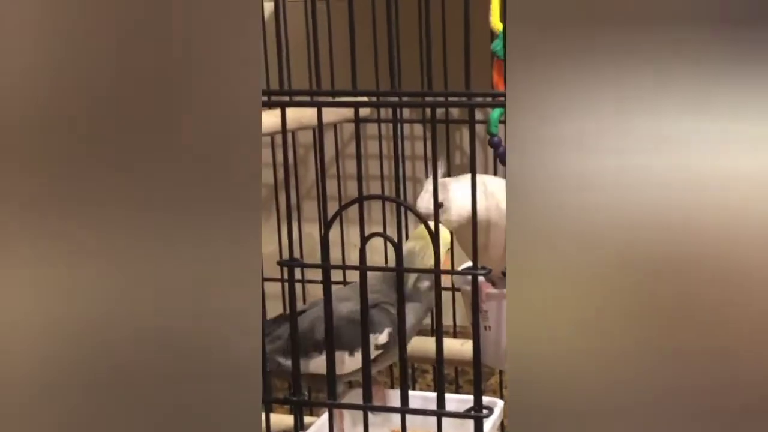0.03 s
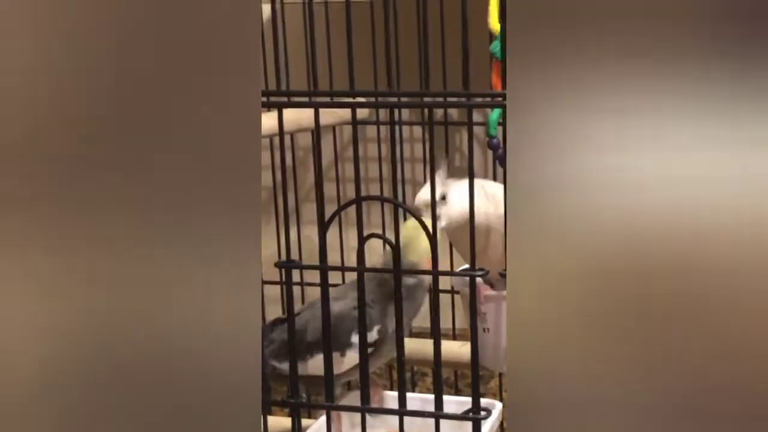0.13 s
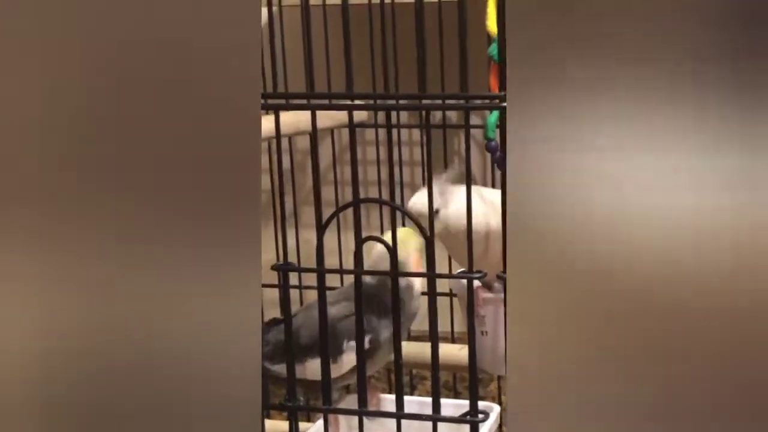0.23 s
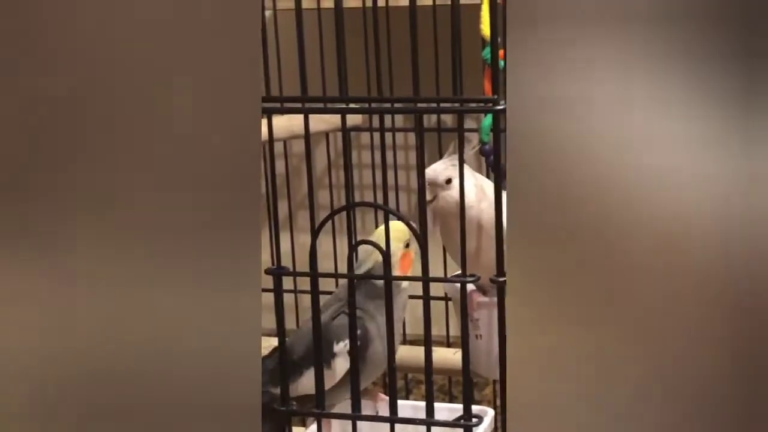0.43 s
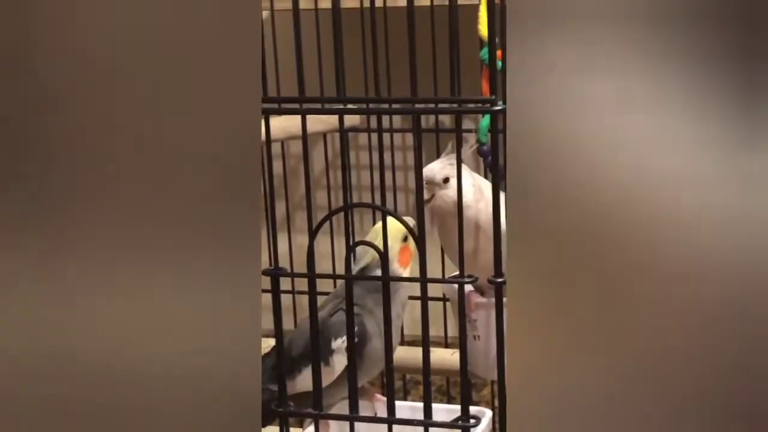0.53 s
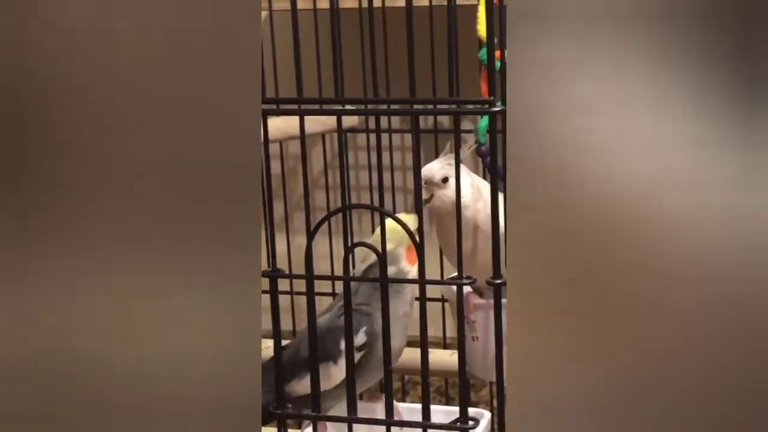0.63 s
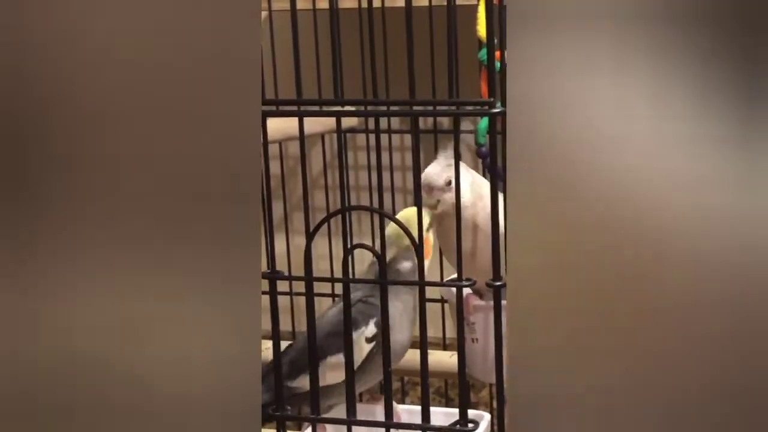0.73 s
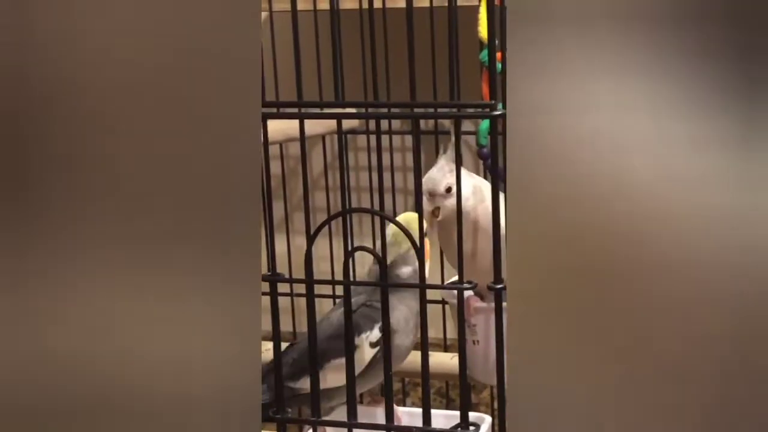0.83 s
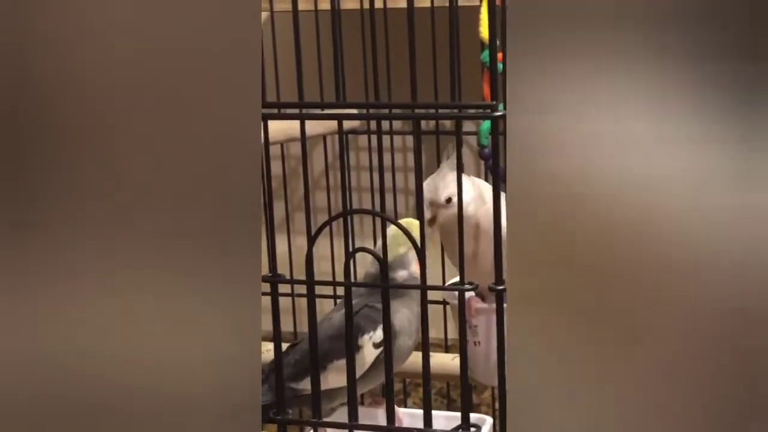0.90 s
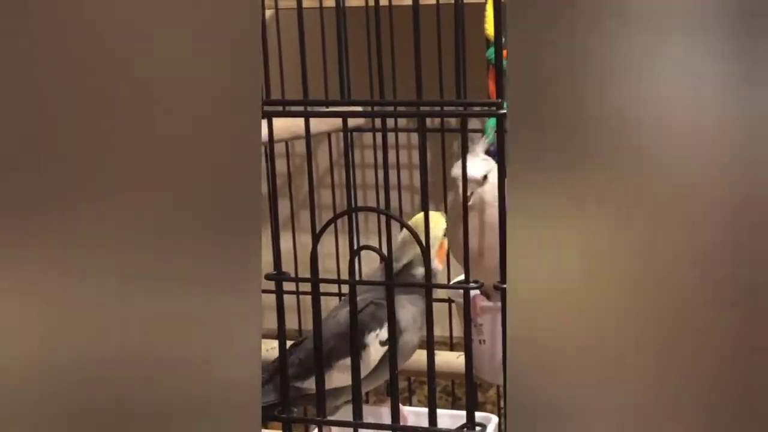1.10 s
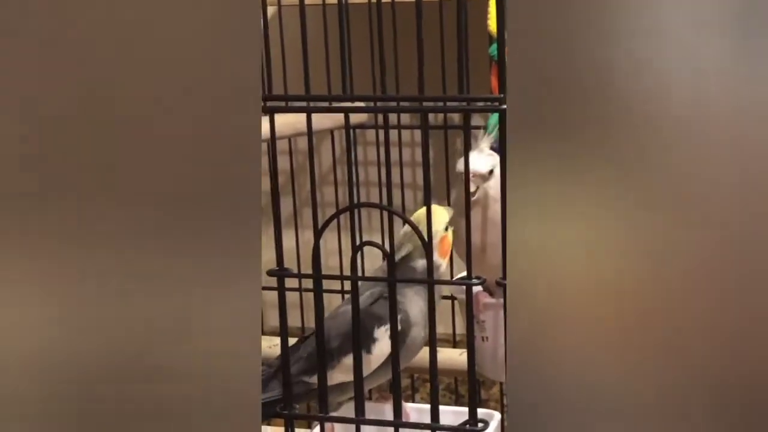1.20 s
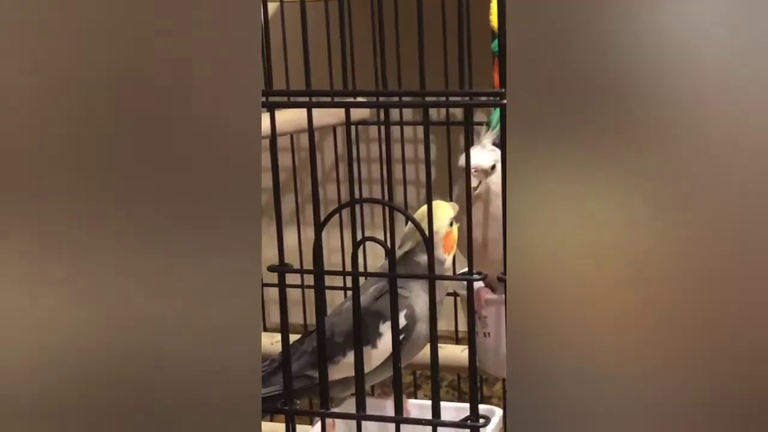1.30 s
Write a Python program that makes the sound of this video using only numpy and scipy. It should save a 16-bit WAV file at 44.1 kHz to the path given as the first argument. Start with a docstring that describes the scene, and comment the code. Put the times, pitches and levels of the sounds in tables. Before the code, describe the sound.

Two caged cockatiels quarrel with a harsh, raspy screech and hisses in a small room.

```python
"""Two caged cockatiels quarrel: a low squawk, a harsh screech in several pushes, and hisses.
Each squawk is an unsteady whistle of the syrinx with its harmonics, wrapped in a rasp of
sputtering air that rings the throat. The scene opens on the breathy tail of a squawk, and the
screech ends on a whistle and a rattle of puffs.
The cage ticks faintly; the small room rings briefly over a low hum."""
import sys
import numpy as np
from scipy import signal
from scipy.fft import rfft, irfft
from scipy.io import wavfile
from scipy.ndimage import map_coordinates

SR = 44100
rng = np.random.default_rng(int(sys.argv[2]) if len(sys.argv) > 2 else 0)


def waveform_to_disk(signal):
    """Save audio, clipped to [-1, 1], as 16-bit WAV at the path in sys.argv[1]."""
    frames = np.transpose(np.atleast_2d(signal))
    scaled = np.clip(frames, -1, 1) * 32767
    samples = np.round(scaled).astype(np.int16)
    wavfile.write(sys.argv[1], SR, samples)


N = 59535

# Syrinx notes: the squawk, the first and last push of the screech, the closing whistle
# (time [s], pitch [Hz], level [dB], roughness [0-1])
LOW_SQUAWK = [(.217, 1901, -58, 0.98), (.228, 2068, -45, 0.57), (.238, 2078, -45, 0.6),
              (.248, 2305, -40.5, 0.25), (.257, 2235, -44, 1), (.266, 2405, -36, 0.22),
              (.277, 2419, -51, 1.1), (.287, 2501, -36.5, 0.1), (.298, 2460, -43, 0.5)]
RISING_SCREECH = [(.394, 2420, -46, 0.52), (.406, 2327, -55, 0.63), (.409, 2507, -31.5, 0.084),
                  (.413, 2478, -38, 0.33), (.427, 2487, -28.5, .06), (.432, 2800, -41, 0.39),
                  (.442, 3160, -28, 0.25), (.451, 3240, -34, 0.048), (.469, 3275, -29.5, 0.3),
                  (.480, 3310, -43, 0.26)]
SHORT_SCREECH = [(.574, 2490, -39.5, 0.52), (.586, 2900, -47, 0.65), (.594, 3180, -32, 0.077),
                 (.599, 3132, -40, .3), (.610, 3047, -44, 0.73)]
WHISTLE = [(.606, 2080, -62, 0.33), (.621, 2140, -32, .15), (.625, 2091, -31, 0.041),
           (.633, 2112, -30.5, 0.047), (.642, 2050, -43, .25)]
# Middle push of the screech, settling into a steady 3.2 kHz room ring (same columns)
MIDDLE_PUSH_AND_RING = [(.483, 2296, -51, 0.98), (.508, 2683, -57.5, 0.47), (.517, 3180, -45, 0.15),
                        (.565, 3220, -47, 0.083)]
# The syrinx's second side sounding apart, and the voiced core of a late hiss (same columns)
SQUAWK_SECOND_SIDE = [(.224, 2080, -43.5, 0.03), (.229, 2050, -47.5, 0.14), (.233, 1772, -52, 0.25),
                      (.242, 1697, -43.5, .2), (.250, 1660, -55, 0.6)]
SCREECH_SECOND_SIDE = [(.458, 2400, -44, 0.47), (.462, 2510, -26.5, 0.25), (.466, 2480, -36, 0.52),
                       (.484, 2380, -44.5, 0.82), (.496, 2090, -43, 0.55), (.512, 2100, -42, 0.16),
                       (.522, 2380, -36, 0.25), (.538, 2185, -40, 0.77), (.568, 2320, -46, 0.85)]
HISS_CORE = [(.907, 2780, -53, .8), (.934, 2530, -49, .85), (.984, 2366, -46, 0.8), (.992, 2285, -40, .45),
             (.998, 2380, -48, 0.85), (1.014, 2530, -46, 0.67)]
# Harmonic balance of the notes, from the fundamental up (relative level [dB])
LOW_HARMONICS = [-2.5, -6, -8.5, -16]
SCREECH_HARMONICS = [-13.5, 1.3, -11.5]
MIDDLE_HARMONICS = [0, 0.72, -5]
WHISTLE_HARMONICS = [-38, 16, -14, -15]
CORE_HARMONICS = [-27, 5, -15]
def squawks():
    """The pitched layer of the calls; the two sides of the syrinx can hold separate notes."""
    return (syrinx(LOW_SQUAWK, LOW_HARMONICS) + syrinx(SQUAWK_SECOND_SIDE, CORE_HARMONICS)
            + syrinx(RISING_SCREECH, SCREECH_HARMONICS)
            + syrinx(MIDDLE_PUSH_AND_RING, MIDDLE_HARMONICS)
            + syrinx(SCREECH_SECOND_SIDE, CORE_HARMONICS)
            + syrinx(SHORT_SCREECH, SCREECH_HARMONICS)
            + syrinx(WHISTLE, WHISTLE_HARMONICS)
            + syrinx(HISS_CORE, CORE_HARMONICS))


JITTER, JITTER_HZ = 0.0566, 850  # pitch spread at full roughness, and its speed
SHIMMER_DB, SPUTTER_HZ = 7, 294  # level spread at full roughness, and its speed
def syrinx(note, harmonics):
    """A whistle with harmonics; roughness shakes its pitch and level."""
    hz, db, rough = (automation(note, column) for column in (1, 2, 3))
    rough = np.clip(rough, 0, 1)
    pitch = hz * (1 + JITTER * rough * wander(JITTER_HZ))
    phase = 2 * np.pi * np.cumsum(pitch) / SR
    weights = undb(harmonics) / np.sqrt(np.sum(undb(harmonics) ** 2) / 2)
    tone = sum(w * np.sin(k * phase) for k, w in enumerate(weights, 1))
    shimmer_db = SHIMMER_DB * rough * np.clip(wander(SPUTTER_HZ), -2, 2)
    return tone * undb(db + shimmer_db) * gate(note)


# Breath envelopes of the squawk and the three pushes (time [s], level [dB])
LOW_RASP = [(.216, -45), (.226, -42.5), (.250, -49.5), (.280, -47.5), (.296, -50)]
FIRST_RASP = [(.394, -35), (.405, -38.5), (.415, -32.5), (.432, -36), (.456, -42.5), (.464, -45.5),
              (.474, -40), (.482, -37)]
MIDDLE_RASP = [(.480, -51), (.497, -37.5), (.514, -41.5), (.522, -33.5), (.538, -47), (.551, -70),
               (.570, -50)]
LAST_RASP = [(.574, -49), (.603, -35.5), (.618, -40), (.632, -38)]
# Throat colour of each (frequency [Hz], relative level [dB])
LOW_THROAT = [(300, -13), (850, -3.5), (1300, -8), (1700, 3), (2200, -8), (2700, 2.5), (3500, 3),
              (5200, -3), (6800, -1.5), (8200, -27), (10000, -2), (12000, -17.5)]
FIRST_THROAT = [(1400, -46), (2100, -10.5), (2600, -16.5), (3500, -27.5), (4300, -4.5), (4900, 3.5),
                (5500, -0.5), (6100, 1.5), (7100, -2), (9000, -8.5), (12000, -15.5)]
MIDDLE_THROAT = [(1500, -51), (2500, -12), (2950, -20), (3200, 0), (3500, 0), (4670, 0.5), (5500, 3),
                 (5830, 5), (6370, 2), (7610, -3), (9080, 0), (11200, -14), (12100, -25)]
LAST_THROAT = [(1900, -40), (2500, -10), (3050, 1.5), (3700, -36), (4400, 11.5), (5100, 11), (6150, 12),
               (6800, 0), (7400, -14), (8600, 12.5), (9800, -7), (11500, -2)]
# The throat tightens and relaxes in the first push (time [s], resonance shift [ratio])
FIRST_GLIDE = [(0.395, 0.93), (.428, 1.01), (.448, 1.08), (0.469, .98)]
def rasps():
    """The breath layer: rasping air around the squawk and each push of the screech."""
    return (rasp(LOW_RASP, LOW_THROAT) + rasp(FIRST_RASP, FIRST_THROAT, FIRST_GLIDE)
            + rasp(MIDDLE_RASP, MIDDLE_THROAT) + rasp(LAST_RASP, LAST_THROAT))


def rasp(envelope, throat, glide=None):
    """Air torn into irregular puffs, coloured by the throat, whose resonances may glide."""
    air = noise(throat)
    if glide is not None:  # varispeed moves all resonances together
        air = map_coordinates(air, [np.cumsum(automation(glide))], order=5, mode="mirror")
    return air * flutter(SPUTTER_HZ, depth_db=4) * undb(automation(envelope)) * gate(envelope)


# Envelope of the rattle's puffs (time [s], level [dB])
RATTLE = [(.634, -34), (.638, -22), (0.647, -35.5), (0.655, -29.5), (.668, -34.5), (0.685, -34)]
# Throat colour of the rattle (frequency [Hz], relative level [dB])
RATTLE_THROAT = [(2300, -37), (3100, -24), (3750, -30), (4150, 1.5), (4500, 6.5), (5300, -7), (6100, 8),
                 (6700, -12), (7350, -42), (8600, -7), (10200, -12), (12000, -28)]
RATTLE_START_HZ, RATTLE_END_HZ, RATTLE_JITTER, PUFF_DECAY_S = 268.4, 169.3, .06, 0.0023
def rattle():
    """The whistle breaks into separate puffs that slow down and fade, each ringing the throat."""
    t = times()
    start, end = RATTLE[0][0], RATTLE[-1][0]
    on = (t > start) & (t < end)
    rate = np.interp(t, (start, end), (RATTLE_START_HZ, RATTLE_END_HZ))
    rate *= 1 + RATTLE_JITTER * wander(RATTLE_END_HZ)
    puff_age = (np.cumsum(rate * on) / SR % 1) / rate
    puffs = on * np.exp(-puff_age / PUFF_DECAY_S) * undb(automation(RATTLE))
    return noise(RATTLE_THROAT, puffs)


# The breathy tail of a squawk, then four hisses; a negative sag swells
# (start [s], length [s], level [dB], attack [s], sag [dB/s], release [s])
BREATHS = [(-.01, 0.072, -50.5, .008, 46, 0.027), (0.077, 0.13, -53.5, 0.014, -26, 0.024),
           (0.711, 0.059, -51, 0.0061, 31, 0.034), (0.902, 0.075, -43.5, 0.034, 31, 0.019),
           (1.011, 0.018, -45, 0.0055, 5, 0.023)]
# One throat colour per breath (frequency [Hz], relative level [dB])
BREATH_THROATS = [
    [(1800, -25), (2450, -13), (2700, -18), (3220, -6.5), (3700, -18.5), (4600, -10), (5050, 1),
     (5450, -14.5), (6300, -8), (8300, -27), (11000, -21)],
    [(1800, -16), (2500, -10.5), (3500, -18), (4000, 1), (4900, -3.5), (5800, -10), (7300, -14.5),
     (9000, -12), (12000, -30)],
    [(2000, -15.5), (2600, -9), (3050, 1.5), (3500, -11.5), (4150, 6.5), (4650, 0), (5300, -6.5),
     (5900, -17), (7700, -15), (9400, -4), (10600, -24)],
    [(1750, -53), (2200, -15), (2650, -10), (3400, -20.5), (4100, -3.5), (4800, -5), (5700, -0.5),
     (6400, -5), (7100, -24), (8500, -10.5), (10000, -11.5), (12000, -28.5)],
    [(2400, -16), (3250, -5.5), (3700, -4.5), (4400, 4.5), (5300, 4), (6200, -8), (6800, -20), (8400, -2),
     (9200, -12), (10200, -9), (11200, -41)],
]
def breaths():
    """Sputtering air for a squawk's tail and four hisses: attack, a sloping hold, release."""
    out = np.zeros(N)
    for (start, length, db, attack, sag, release), throat in zip(BREATHS, BREATH_THROATS):
        age = times() - start
        fade_in = np.sqrt(np.clip(age / attack, 0, 1))
        hold = undb(db - sag * np.clip(age, 0, length))
        fade_out = np.exp(-np.maximum(age - length, 0) / release)
        out += fade_in * hold * fade_out * noise(throat) * flutter(SPUTTER_HZ, depth_db=1.5)
    return out


# Taps on the cage (time [s], level [dB])
TICKS = [(1.221, -57), (1.296, -64.5)]
# Ring of the bars (frequency [Hz], relative level [dB])
TICK_COLOUR = [(2000, -9), (3500, -22), (4700, 2), (6500, -16), (9000, 1.5), (12000, -28)]
TICK_DECAY_S = 0.0066
def cage():
    """Light taps of a claw or beak on the bars."""
    t = times()
    taps = sum(undb(db) * (t > s) * np.exp(-np.abs(t - s) / TICK_DECAY_S) for s, db in TICKS)
    return noise(TICK_COLOUR) * taps


# Early reflections from wall, tray and shelf (delay [s], relative level [dB])
REFLECTIONS = [(.0027, -13.5), (.0046, 0)]
def reflect(x):
    """Near surfaces comb the breathy sounds; their power stays the same."""
    t = times()
    echoes = sum(undb(db) * map_coordinates(x, [np.round((t - delay) * SR)], order=0)
                 for delay, db in REFLECTIONS)
    return (x + echoes) / np.sqrt(1 + sum(undb(db) ** 2 for _, db in REFLECTIONS))


ROOM_T60_S, TREBLE_T60_S, CROSSOVER_HZ = 0.32, 0.24, 6500
WET_DB, PREDELAY_S = -5, 0.0024
def room(x):
    """Direct sound and a short diffuse tail whose treble dies first."""
    t, grain = times(), rng.standard_normal(N)
    low = signal.sosfiltfilt(signal.butter(2, CROSSOVER_HZ, fs=SR, output="sos"), grain)
    treble = grain - low
    tail = (low * undb(-60 * t / ROOM_T60_S) + treble * undb(-60 * t / TREBLE_T60_S)) * (t > PREDELAY_S)
    return x + undb(WET_DB) * signal.fftconvolve(x, tail / np.linalg.norm(tail))[:N]


# Quiet hum tones (frequency [Hz], level [dB], waver [dB])
HUM = [(48.6, -70, -1.5), (396, -68, 1.5), (501.4, -74, 2)]
# The strongest tone starts louder, dips briefly and settles (time [s], level [dB])
LOUD_HUM = [(0, -56.5), (.12, -57), (.17, -81), (.25, -67), (1.35, -64.5)]
LOUD_HUM_HZ, WAVER_HZ = 149.2, 7.0
def hum():
    """Mains hum: four low tones, each wavering in level."""
    def tone(hz, db, waver_db):
        gain = np.sqrt(2) * undb(db) * flutter(WAVER_HZ, waver_db)
        return gain * np.sin(2 * np.pi * (hz * times() + rng.random()))
    return sum(tone(*row) for row in HUM) + tone(LOUD_HUM_HZ, automation(LOUD_HUM), waver_db=3.5)


# Colours of the room's low bed and its air (frequency [Hz], relative level [dB])
FLOOR = [(41, -36), (70, -14), (130, -11.5), (219, -9), (389, -9), (426, -13), (615, -12.5), (1440, -22.5),
         (2080, -34.5)]
AIR = [(1200, -14), (1800, -8), (3000, -10.5), (5000, -2), (8000, -11), (11500, -12.5), (12500, -36)]
FLOOR_DB, AIR_DB = -59.5, -67.5
def room_tone():
    """A steady bed of low room noise and faint air."""
    return undb(FLOOR_DB) * noise(FLOOR) + undb(AIR_DB) * noise(AIR)


def noise(colour, drive=1):
    """Noise of rms 1, shaped in time by drive, then rung through a colour curve."""
    hz, db = np.array(colour, float).T
    octave = np.log2(np.maximum(np.arange(N + 1) * SR / (2 * N), 1))
    outside = np.maximum(np.log2(hz[0]) - octave, 0) + np.maximum(octave - np.log2(hz[-1]), 0)
    gain = undb(np.interp(octave, np.log2(hz), db) - 30 * outside)  # skirts of 30 dB per octave
    source = rng.standard_normal(2 * N) * np.resize(drive, 2 * N)
    return irfft(rfft(source) * gain)[:N] / np.sqrt(np.mean(gain ** 2))


def wander(hz):
    """Smooth random modulation of spread 1 that changes about hz times a second."""
    f = np.arange(N + 1) * SR / (2 * N)
    y = irfft(rfft(rng.standard_normal(2 * N)) * np.exp(-(f / hz) ** 2))
    return y[:N] / y.std()


def flutter(hz, depth_db):
    """Uneven gain with mean power 1."""
    gain = undb(depth_db * np.clip(wander(hz), -2, 2))
    return gain / np.sqrt(np.mean(gain ** 2))


def gate(curve, edge_s=0.0025):
    """Open from a curve's first breakpoint to its last, with quick edges."""
    t, start, end = times(), curve[0][0], curve[-1][0]
    return np.clip((t - start) / edge_s + .5, 0, 1) * np.exp(-np.maximum(t - end, 0) / edge_s)


def automation(curve, column=1):
    """Straight ramps between the timed breakpoints of one column."""
    points = np.array(curve, float)
    return np.interp(times(), points[:, 0], points[:, column])


def undb(db):
    """Decibels to gain."""
    return 10 ** (np.asarray(db) / 20)


def times():
    """Time of each sample in seconds."""
    return np.arange(N) / SR


def scene():
    """Birds and cage in the room, over hum and room tone, in mono."""
    birds = squawks() + reflect(rasps()) + rattle() + reflect(breaths())
    return (room(birds + cage()) + hum() + room_tone())[None]


TOP_HZ = 12000
def record(dry):
    """A steep low-pass cuts the top."""
    return signal.sosfilt(signal.ellip(8, .2, 60, TOP_HZ, fs=SR, output="sos"), dry)


dry = scene()
out = record(dry)
waveform_to_disk(out)
```